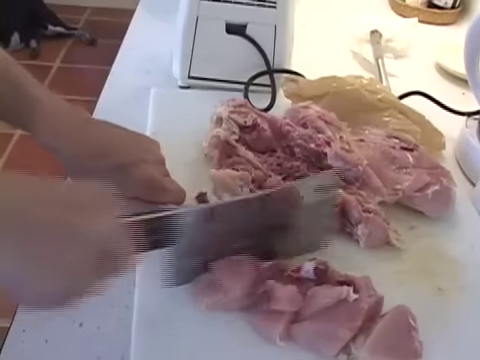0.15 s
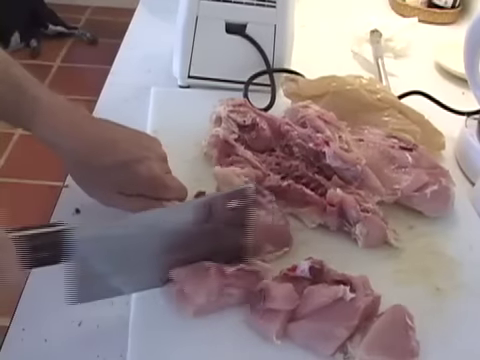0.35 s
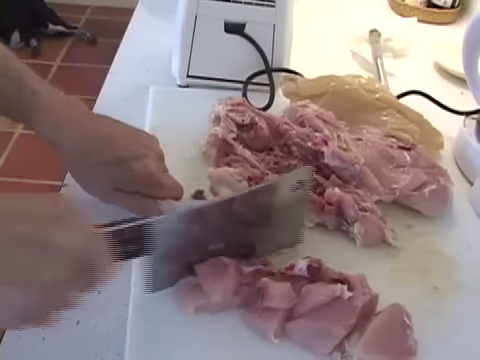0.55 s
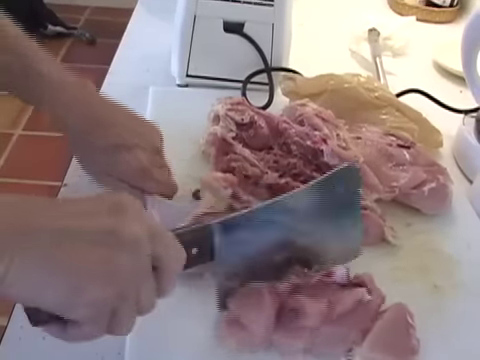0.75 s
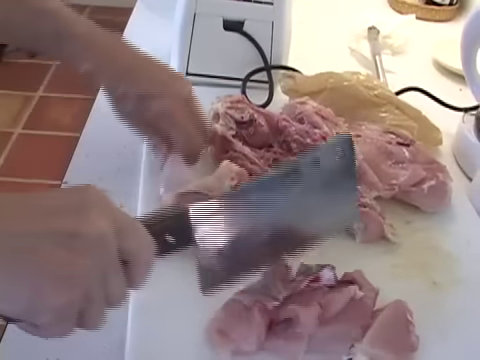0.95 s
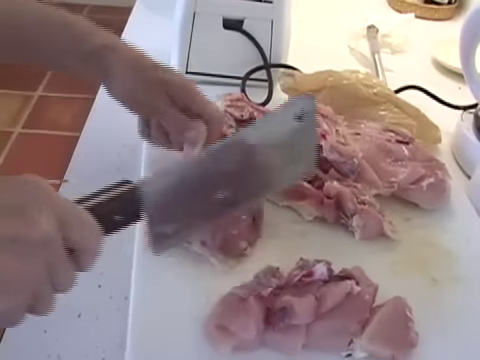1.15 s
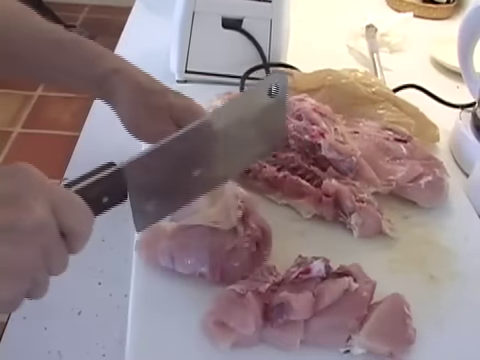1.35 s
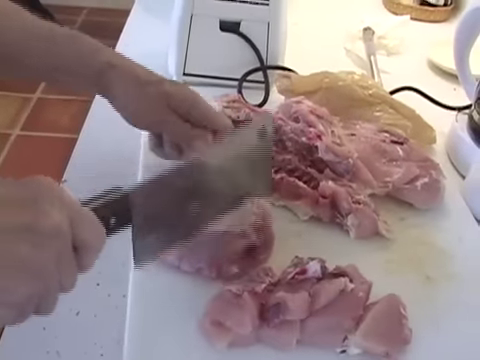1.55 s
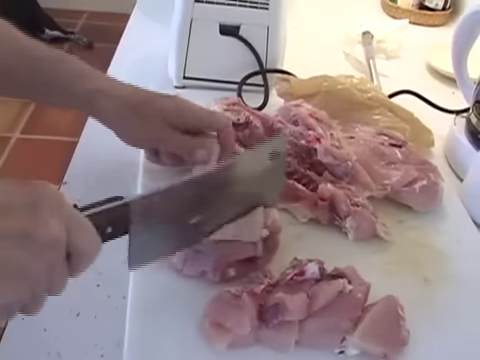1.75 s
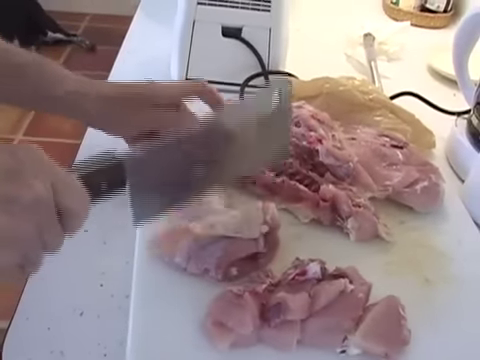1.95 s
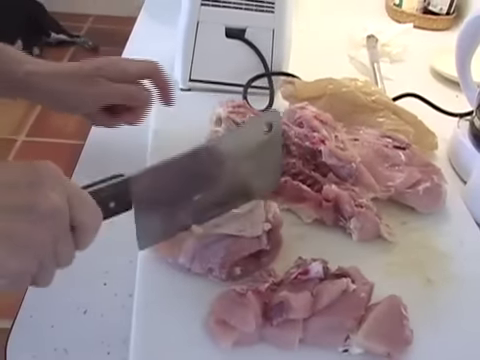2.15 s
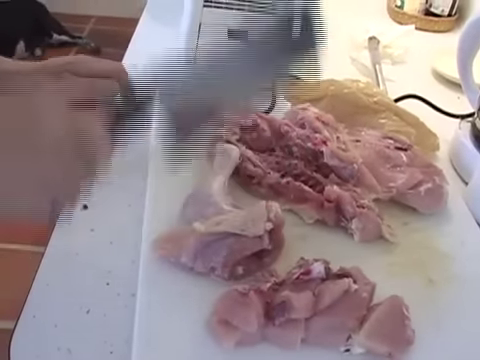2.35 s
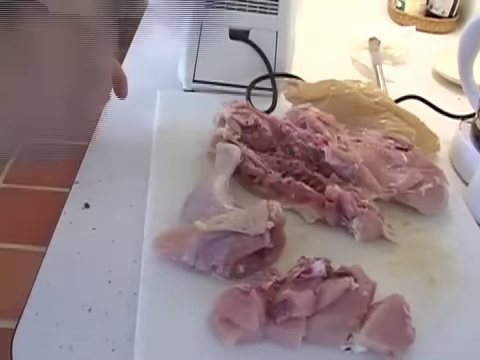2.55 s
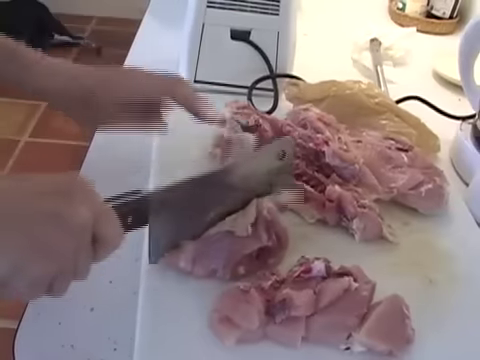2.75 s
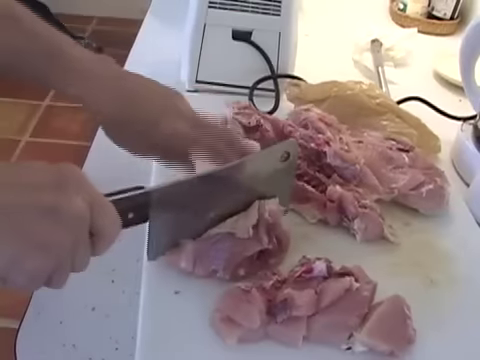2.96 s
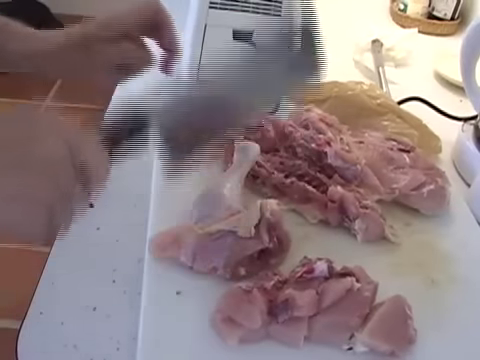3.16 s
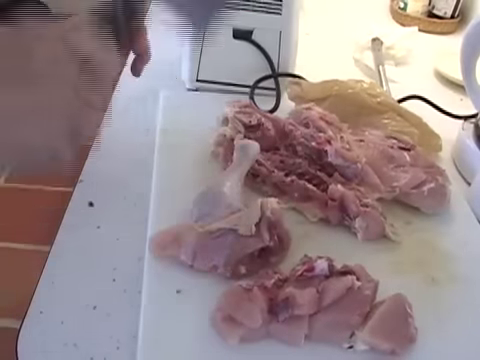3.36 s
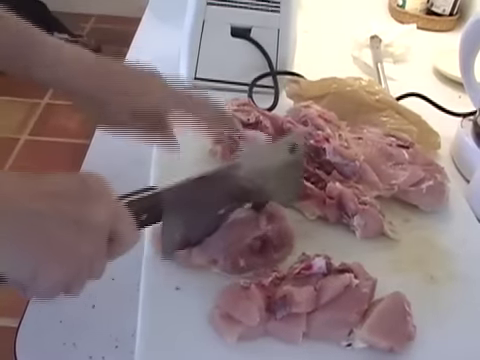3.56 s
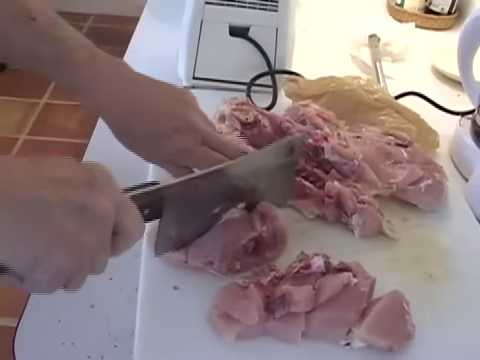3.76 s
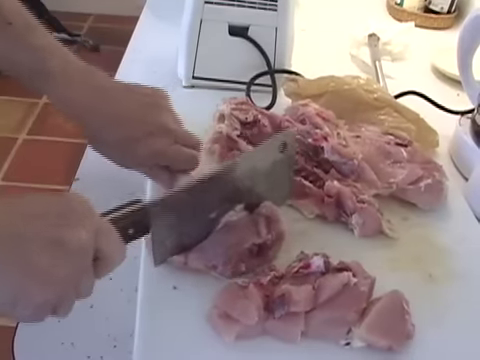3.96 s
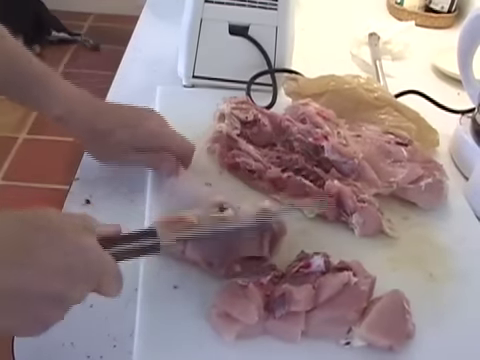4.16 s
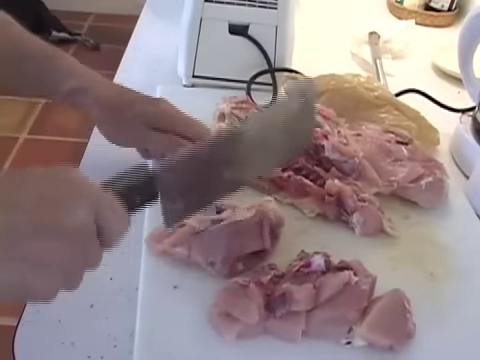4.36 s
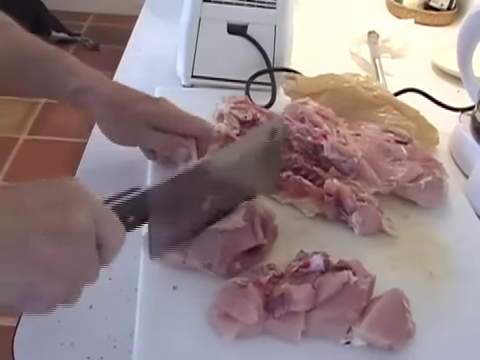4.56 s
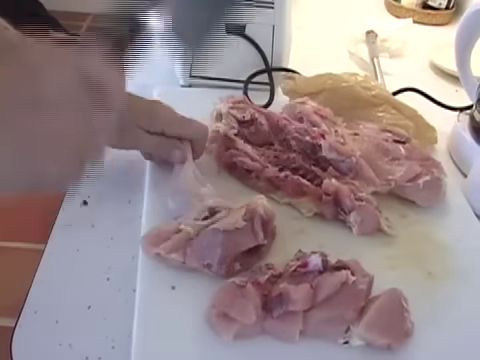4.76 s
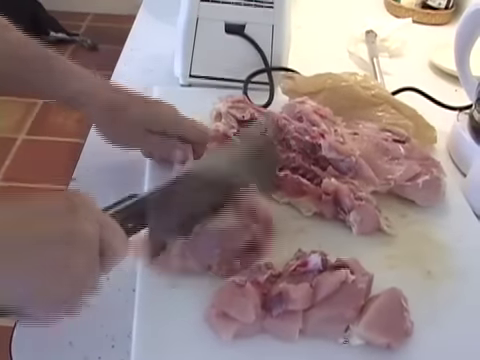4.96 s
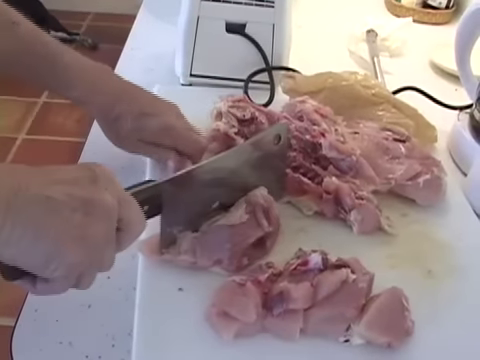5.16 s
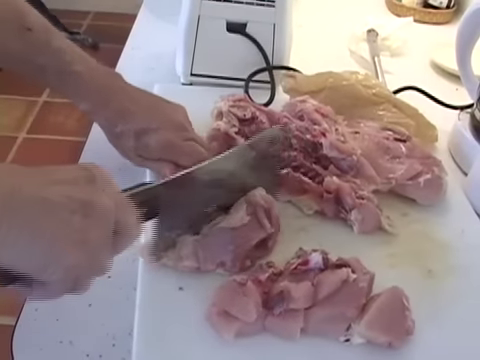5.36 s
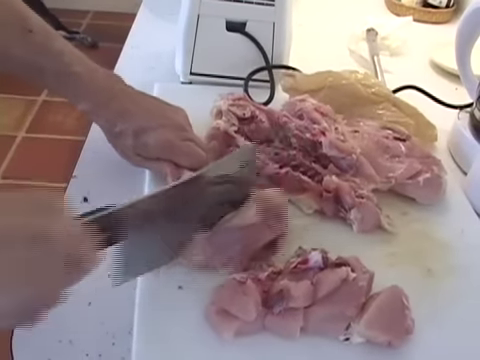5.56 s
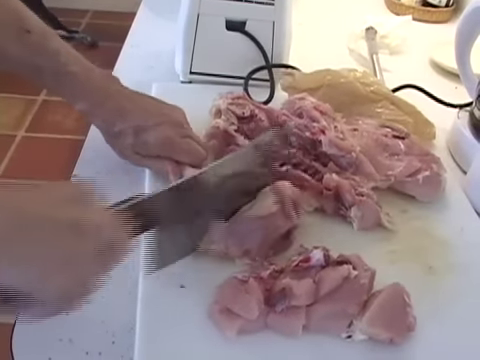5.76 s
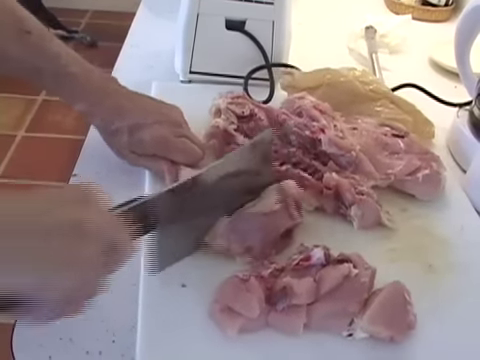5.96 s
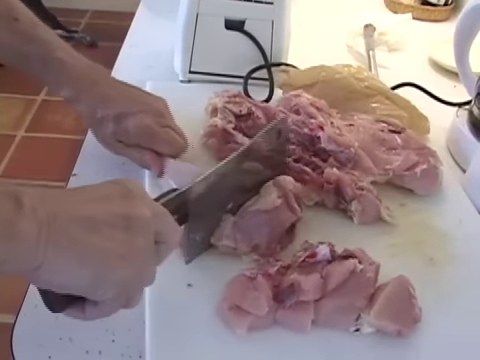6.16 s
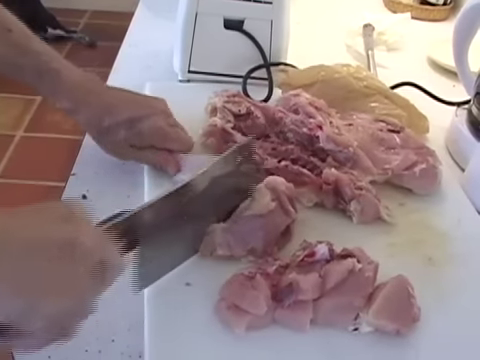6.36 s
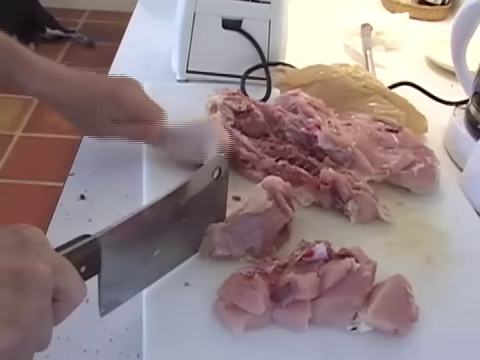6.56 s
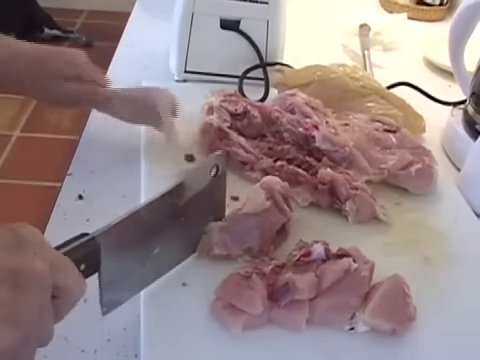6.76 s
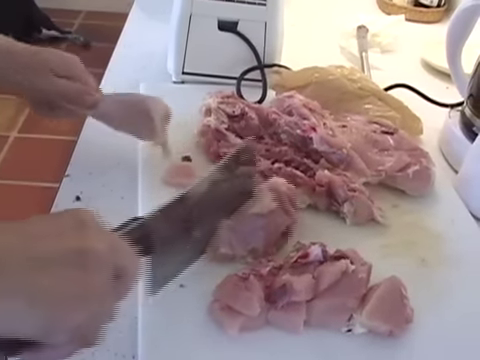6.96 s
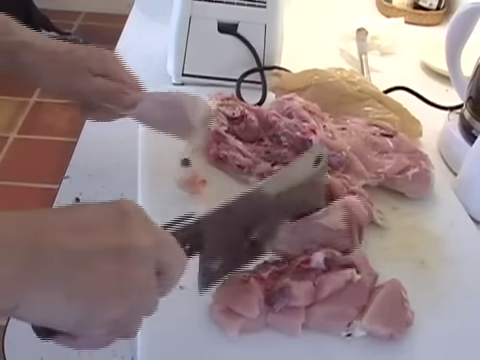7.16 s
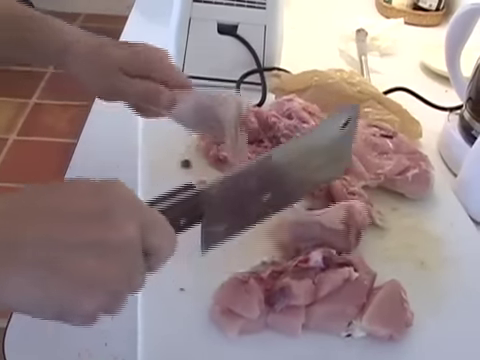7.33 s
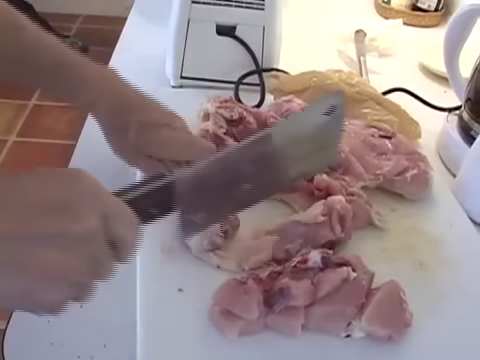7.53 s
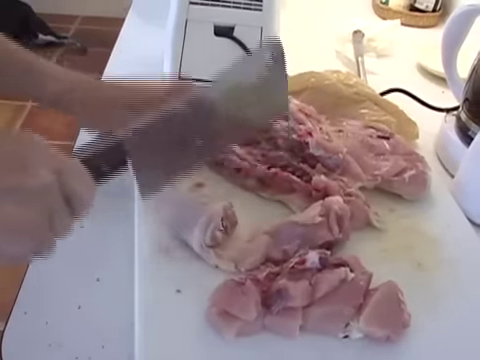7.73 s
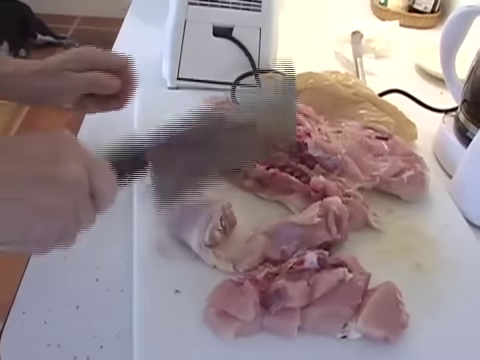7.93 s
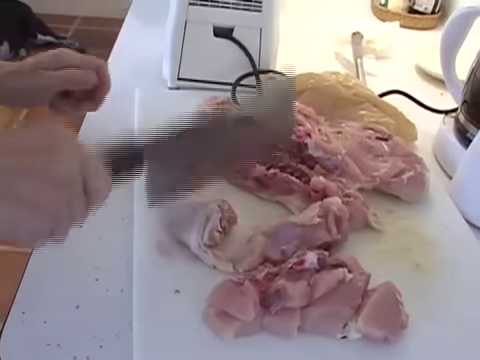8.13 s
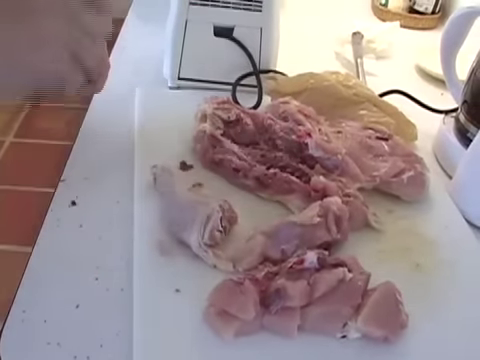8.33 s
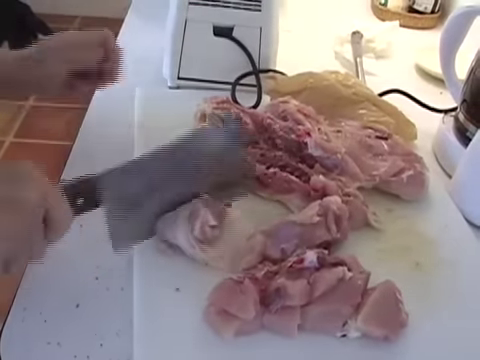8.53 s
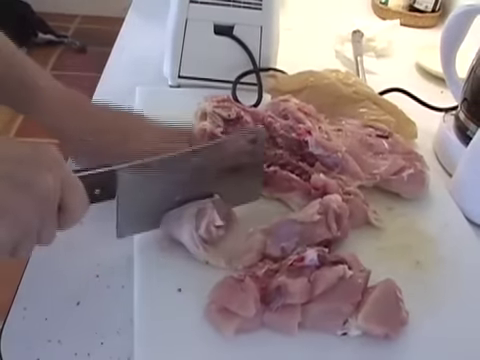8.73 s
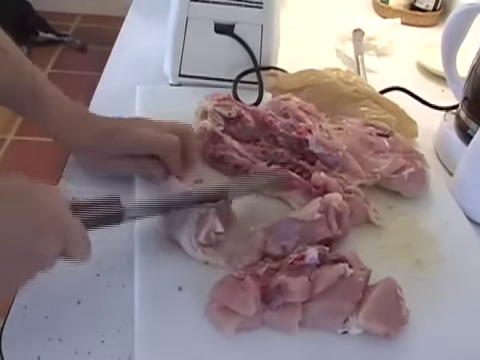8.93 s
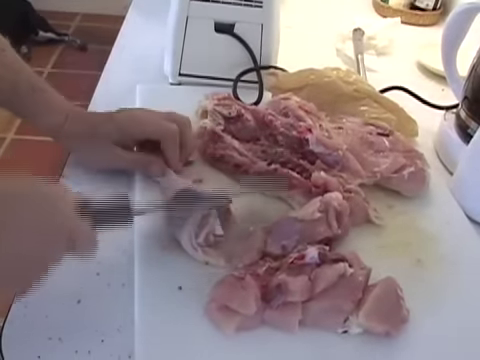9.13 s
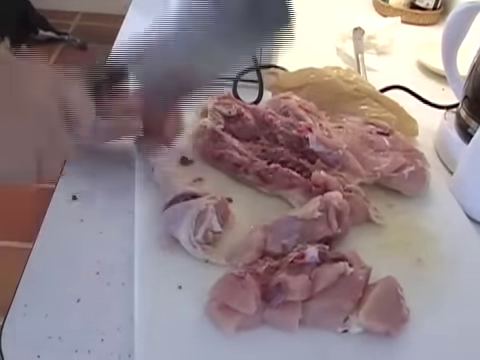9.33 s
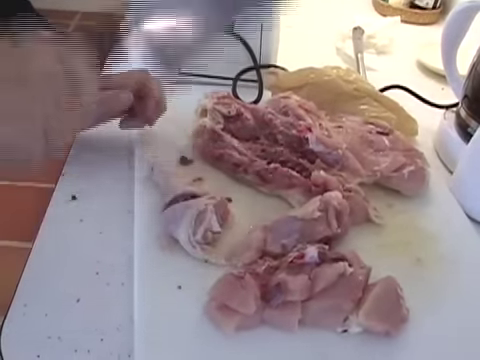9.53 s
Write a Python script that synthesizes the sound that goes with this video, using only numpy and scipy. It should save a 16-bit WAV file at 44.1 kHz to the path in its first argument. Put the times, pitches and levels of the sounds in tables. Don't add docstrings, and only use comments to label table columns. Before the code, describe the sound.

Raspy blade strokes and small wet ticks alternate with loud, ringing cleaver blows on a kitchen counter, with steady hum and fan noise.

```python
import sys
import numpy as np
from scipy import signal
from scipy.fft import rfft, irfft
from scipy.io import wavfile
from scipy.ndimage import uniform_filter1d

SR = 44100
rng = np.random.default_rng(int(sys.argv[2]) if len(sys.argv) > 2 else 0)


def unload_audio(sound):
    columns = np.transpose(np.atleast_2d(sound))
    steps = np.round(np.clip(columns, -1, 1) * 32767)
    wavfile.write(sys.argv[1], SR, steps.astype(np.int16))


def voltage_ratio(level):
    return 10 ** (np.asarray(level, float) / 20)


N = 427329

# centre_hz, width_hz, level_db
BLADE_MODES = [(1130, 70, -2), (1430, 66, 2), (1850, 29, -10), (2800, 30, -4.5), (3000, 22, -5),
               (4100, 52, -9.5), (4640, 87, -9), (5070, 60, -10.5), (7100, 34, -5), (7440, 64.6, -9.5),
               (8940, 45, -12)]


def evened(x):
    return x / np.sqrt(np.mean(x ** 2) + 1e-20)


def read(points, hz):
    f, value = np.transpose(points)
    return np.interp(np.log(hz + 1), np.log(f + 1), value)


def add(mix, start_s, sound):
    part = mix[..., round(start_s * SR):][..., :sound.shape[-1]]
    part += sound[..., :part.shape[-1]]


def colour(x, points):
    gain = voltage_ratio(read(points, np.fft.rfftfreq(len(x), 1 / SR)))
    return irfft(rfft(x) * gain, len(x))


def band(x, lo_hz, hi_hz):
    sos = signal.butter(3, [lo_hz, hi_hz], "bandpass", fs=SR, output="sos")
    return evened(signal.sosfilt(sos, x))


def resonate(x, hz, width_hz):
    turn = np.exp(2j * np.pi * hz * np.arange(len(x)) / SR)
    r = np.exp(-np.pi * width_hz / SR)
    return 2 * (turn * signal.lfilter([1 - r], [1, -r], x / turn)).real


def wander(length, rate_hz):
    return evened(signal.lfilter([1], [1, -np.exp(-2 * np.pi * rate_hz / SR)], rng.standard_normal(length)))


def noise_pair(length, same, shape):
    frames, hz = length // 128 + 5, np.fft.rfftfreq(512, 1 / SR)[:, None]
    a, b, c, d = rng.standard_normal((frames, 257, 4)).T
    like = np.clip(read(same, hz), -.985, .985)
    left = a + 1j * b
    right = like * left + np.sqrt(1 - like ** 2) * (c + 1j * d)
    z = np.array([left, right]) * shape(hz, np.arange(frames) * 128 / SR)
    return signal.istft(z, nperseg=512, noverlap=384)[1][:, :length]


def causal(points):
    log_gain = np.log(voltage_ratio(read(points, abs(np.fft.fftfreq(8192, 1 / SR)))))
    return np.fft.ifft(np.exp(log_gain - 1j * signal.hilbert(log_gain).imag)).real[:4096]


def stroke(start_s, bear_s, slide_s, top_db, lost_db):
    # hz, level_db (per Hz)
    rub = [(500, -32), (1000, 0), (1450, 1), (2600, -4.5), (5000, -10), (7200, -15.5), (10000, -41.5),
           (15000, -68)]
    lift_s, push_lag_s, grit = .05, 0.02, .27
    t = np.arange(0, bear_s + slide_s + lift_s, 1 / SR)

    def pressure_db(t):
        rise_db = -19 * np.clip(1 - t / bear_s, 0, 2) ** 1.6
        loss_db = lost_db * np.clip((t - bear_s) / slide_s, 0, 1)
        lift_db = -22.5 * np.maximum(t - bear_s - slide_s, 0) / lift_s
        return top_db + rise_db - loss_db + lift_db

    slip_db = 4.5 * np.minimum(rng.exponential(1, len(t)), 3)
    slips = (rng.random(len(t)) < 900 / SR) * voltage_ratio(slip_db) * rng.choice([-1, 1], len(t))
    drive = (1 - grit) * rng.standard_normal(len(t)) + grit * evened(slips)
    steel = evened(sum(voltage_ratio(db) * evened(resonate(drive, hz, 1.2 * w)) for hz, w, db in BLADE_MODES))
    push = band(drive, 130, 1100) + 1.6 * evened(resonate(drive, 300, 120))
    push_db = -7.5 + 3 * (5.8 < start_s < 7.3)
    hiss_db = -67.5 + .15 * (pressure_db(t) + 40)
    sound = voltage_ratio(pressure_db(t)) * (evened(colour(drive, rub)) + voltage_ratio(-8.5) * steel)
    sound += voltage_ratio(pressure_db(t - push_lag_s) + push_db) * push
    sound += voltage_ratio(hiss_db) * band(drive, 6500, 12500)
    return voltage_ratio(-5.0 + 2.6 * wander(len(t), 40)) * sound * signal.windows.tukey(len(t), .08)


def kitchen():
    # pitch_hz, level_db (rms)
    hum = [(59.2, -61.5), (102.3, -58), (118.4, -51.5), (199.2, -57), (236.9, -61), (301.5, -58.5),
           (376.8, -66), (403.7, -64.5), (672.9, -66), (1082, -68.5)]
    # hz, level_db (per Hz)
    fan = [(12, -37), (20, -8.5), (120, -3.5), (170, -13.5), (390, -8), (620, -16), (1000, -14),
           (2000, -30)]
    # hz, likeness (-1 to 1)
    fan_same = [(60, 0.91), (150, 1), (380, 0.92), (950, 0.97), (2380, 0.11), (5980, 0.12), (15000, -0.4)]
    # hz, level_db (per Hz)
    mic_hiss = [(1000, -1), (2670, -0.5), (12400, -5.5), (16000, -7)]
    fan_db, mic_hiss_db = -43, -66

    def shape(hz, t):
        fan_shape_db = read(fan, np.minimum(hz, 2000)) - 22 * np.log2(np.maximum(hz / 2000, 1))
        hiss_shape_db = read(mic_hiss, hz) + mic_hiss_db - fan_db - 9
        return np.hypot(voltage_ratio(fan_shape_db), voltage_ratio(hiss_shape_db)) + 0 * t

    lines = np.zeros(N)
    for hz, db in hum:
        phase = 2 * np.pi * np.cumsum(hz + 1.5 * wander(N, 4.3)) / SR
        lines += voltage_ratio(db + 3.1 * wander(N, 2.2)) * np.sin(phase)
    air = evened(noise_pair(N, fan_same, shape))
    air_gain = voltage_ratio(fan_db - 3.5 + 1.2 * wander(N, 1.7))
    return np.sqrt(2) * lines * voltage_ratio([[-1.5], [1.2]]) + air_gain * air * voltage_ratio([[-.6], [.6]])


def mode(hz, db, t60_s, rise_s=0.0023):
    t = np.arange(round(min(t60_s, .75) * SR)) / SR
    return voltage_ratio(db - 60 * t / t60_s) * np.sin(2 * np.pi * hz * t) * (1 - np.exp(-t / rise_s))


def tick(db, hz, pan_db, share, decay_s):
    t = np.arange(600) / SR
    click = rng.standard_normal(600) * (t / .0006) * np.exp(-t / decay_s)
    snap = resonate(resonate(click, hz, hz * share), hz, hz * share)
    return voltage_ratio(db - 1.5 - np.array([[-pan_db], [pan_db]]) / 2) * snap / abs(snap).max()


def skip(db, hz):
    # pitch_hz, level_db, t60_s
    knock = [(181, -4.5, 0.067), (328, 0, 0.042), (620, -3, 0.026), (1120, -7, 0.027)]
    sound = np.zeros((2, SR // 2))
    add(sound, 0, tick(db, hz, 1.5, 0.71, 0.00098))
    for f, _, d in BLADE_MODES:
        far_db = 3 * abs(np.log2(f / hz))
        ring_db = db + d - 11.5 - far_db + 2.2 * rng.standard_normal()
        add(sound, 0, mode(f * rng.uniform(1.0, 1.015), ring_db, 0.055, rise_s=0.00062)[None])
    for f, d, t60_s in knock:
        add(sound, 0, mode(f * rng.uniform(0.886, 1.103), db + d - 3, t60_s, rise_s=0.00063)[None])
    return sound


def blow(db, thump_db, body_db, slap_db, crack_db):
    # hz, direct_db, push_db
    blow_shape = [(12, -36, -23.5), (55, -8, 11), (187, 4, 10.5), (503, -3.5, 1.85), (1230, -5, 1),
                  (4460, -1, -12), (8900, -7, -16), (16000, -29.5, -40)]
    blow_part = [1, 1, 2, 0, 3, 4, 4, 4]
    # pitch_hz, level_db, t60_s
    counter = [(35.3, 2, 0.77), (94.1, 8.5, 0.43), (123.7, -2.5, 0.18), (174.4, 1, 0.33), (218, -6, 0.38),
               (295, -3, 0.27), (347.4, 0.5, 0.24), (421.8, -11, 0.13), (506.4, -6, 0.25),
               (583.5, -9.5, 0.051), (780, 0, 0.33), (970, 2.5, 0.18)]
    extra_db = 0.46 * np.maximum(db + 16, 0)
    parts_db = db + extra_db + np.array([0, thump_db - 0.52 * extra_db, body_db, slap_db, crack_db])
    direct_points = [(hz, parts_db[k] + d) for k, (hz, d, _) in zip(blow_part, blow_shape)]
    push_points = [(hz, parts_db[k] + d) for k, (hz, _, d) in zip(blow_part, blow_shape)]

    t = np.arange(2000) / SR
    late = np.maximum(t - .0022, 0)
    burst = (np.exp(-late / 0.0039) + 0.025 * np.exp(-late / .012)) * (1 - np.exp(-late / 0.00046))
    burst += 0.076 * (late == 0)
    direct = np.zeros(SR)
    noise = rng.standard_normal(2000) * burst
    add(direct, 0, voltage_ratio(10.5) * signal.fftconvolve(noise, causal(direct_points)))

    spread = rng.standard_normal((len(counter), 2)) * [1, 2]
    for (hz, d, t60_s), (u, v) in zip(counter, spread):
        part = 1 if hz < 110 else 2 if hz < 280 else 0 if hz < 700 else 3
        add(direct, 0, mode(hz * (1 + 0.017 * u), parts_db[part] - 8.5 + d + v, t60_s))
    for hz, _, d in BLADE_MODES:
        add(direct, .002, mode(hz, parts_db[4] - 21 + d + 3.1 * rng.standard_normal(), .2))
    return direct, voltage_ratio(37) * causal(push_points)


def room(x):
    # hz, t60_s
    room_t60 = [(40, 0.55), (150, 0.41), (500, .37), (1500, 0.38), (4000, 0.39), (9000, 0.33),
                (16000, 0.22)]
    # hz, likeness (-1 to 1)
    room_same = [(60, 1), (950, 1), (1500, 0.91), (2380, 0.31), (5980, -0.14), (15000, -0.3)]
    # hz, lean_db
    room_lean = [(60, -0.8), (500, 0.2), (1500, -1), (4000, 4.5), (8000, 2), (14000, -6.5)]

    def shape(hz, t):
        lean_db = np.array([1, -1])[:, None, None] * read(room_lean, hz) / 2
        return voltage_ratio(lean_db - 60 * t / read(room_t60, hz))

    turn = np.arange(N) / SR * 2 * np.pi * .37
    out = np.zeros((2, N))
    for k in range(3):
        tail = noise_pair(SR, room_same, shape)
        tail *= 1 - np.exp(-np.arange(SR) / SR / 0.0012)
        share = np.sqrt(2 / 3) * np.cos(turn + k * 2 * np.pi / 3)
        out += signal.fftconvolve((x * share)[None], tail / np.linalg.norm(tail[0]), axes=1)[:, :N]
    return out


def scene():
    # start_s, bear_s, slide_s, top_db (pressure), lost_db (while sliding)
    stroke_rows = [(0.0, 0.0063, 0.064, -35.5, 9.5), (0.125, 0.072, 0.076, -29.5, 5.5),
                   (0.315, 0.054, 0.073, -34.5, 3), (0.5, 0.063, 0.11, -36.5, 9),
                   (1.56, .045, 0.071, -56.5, 0), (3.225, 0.033, 0.18, -46.5, 9.5),
                   (4.22, 0.084, 0.036, -46, 10), (4.585, 0.019, .015, -42.5, 14.5),
                   (5.42, 0.12, 0.031, -45.5, 2), (5.63, 0.043, 0.084, -34.5, 8.5),
                   (5.81, 0.099, 0.019, -38, 3.5), (5.965, 0.047, .1, -36.5, 4),
                   (6.185, 0.024, .015, -43, 4.5), (6.32, 0.097, 0.19, -38.5, 15.5),
                   (7.03, 0.047, 0.062, -38, 2), (7.56, 0.028, 0.036, -49, 12), (8.9, .03, .08, -54.5, 1)]
    # start_s, pitch_hz, level_db, t60_s
    ring_rows = [(0.001, 36, -34, .6), (1.601, 170, -33, .1), (2.234, 200, -27, .12), (2.26, 96, -29, .15),
                 (2.725, 300, -10, 0.34), (3.58, 273.6, -24.5, 0.97), (7.591, 149, -35, .15),
                 (8.061, 201, -22, .11), (8.578, 140, -17, .4), (8.581, 347, -4, 0.4)]
    # start_s, peak_db, centre_hz, pan_db
    tick_rows = [(0.0101, -25.5, 4800, 13), (0.027, -34, 3020, 1.5), (2.24, -41, 2660, -2.0),
                 (3.248, -39, 3070, 5), (4.0994, -40, 2800, 5), (4.1594, -39, 3460, 8),
                 (4.248, -40, 3030, 4), (4.3035, -30.5, 7080, 10), (4.318, -38, 4070, 12),
                 (4.3637, -37, 4300, 6), (4.5994, -30, 6200, 6), (4.6114, -35, 5170, 7),
                 (5.8705, -34, 3680, 9), (5.9148, -28, 2960, 3), (6.0748, -26, 2620, 2.0),
                 (6.2128, -42, 2890, 7.5), (7.5882, -30.5, 4980, 7), (8.0603, -43, 4100, 3),
                 (8.9141, -30, 5070, 7), (8.9496, -32, 5900, 4.5), (8.9888, -32.5, 4650, 7),
                 (9.051, -34.5, 8260, 0.5), (9.061, -32.5, 7400, 5), (9.205, -41, 2895, 6)]
    # start_s, peak_db, centre_hz
    nick_rows = [(0.013, -33, 1150), (0.692, -25.5, 1600), (0.7072, -15.5, 980), (4.3022, -31.5, 1230),
                 (5.6747, -33, 1430), (7.1063, -27, 1430), (7.1464, -27, 1000), (8.551, -41.5, 2000),
                 (9.0607, -32, 1430), (9.2053, -32.5, 1390)]
    # start_s, peak_db, centre_hz
    smack_rows = [(0.1575, -40, 7200), (0.8856, -42, 9160), (0.9674, -44, 9670), (2.25, -38, 12000),
                  (2.8654, -30, 8400), (3.742, -43, 11000), (3.8, -41, 7000), (3.832, -40, 6500),
                  (3.873, -47, 10000), (3.951, -44, 9000), (3.96, -38.5, 8400), (3.9759, -36.5, 9040),
                  (4.1727, -37, 9240), (4.2273, -39, 11100), (5.3627, -39, 12100), (5.391, -42, 7280),
                  (5.4485, -40, 7030), (6.525, -29.5, 12100), (6.732, -35, 10330), (7.273, -45, 6000),
                  (7.557, -30.5, 8650), (8.8681, -44, 9180), (9.0369, -37, 8300), (9.0997, -35, 8650),
                  (9.129, -37, 9050)]
    # start_s, peak_db, centre_hz
    skip_rows = [(0.1385, -33, 7100), (0.7065, -15, 1420), (4.2898, -32.5, 7080), (5.679, -22, 2970),
                 (7.0384, -35.5, 3130), (7.054, -35, 4500), (7.0654, -31, 4500), (7.0822, -24.5, 5950),
                 (7.092, -25, 3500), (7.107, -20, 3000), (7.1327, -23.5, 3450), (7.1454, -21.5, 4200),
                 (7.158, -35, 3000)]
    # thump_db (floor), body_db (counter), slap_db, crack_db
    blow_rows = [(0.704, -24.5, -10.5, -5, -5.5, -10.5), (1.599, -46, 2, 4, -15, -9),
                 (2.228, -31.5, 3.5, 7.5, -8, -26), (2.26, -29, -4, 1, -9.5, -23),
                 (2.723, -4, -13, -8, -5, -9.5), (3.536, -5, -10.5, -7, -5.5, -3),
                 (4.654, -51.5, -6, -12, -10.5, -21), (5.047, 5, -17, -17, -6.5, -10.5),
                 (7.589, -40.5, 5.5, 6.5, -3, -8), (8.059, -30.5, -0.5, 10, -16.5, -21),
                 (8.575, -2, -15.5, -10.5, -7.5, -6)]

    blows, pushes, strokes, ticks = np.zeros(N), np.zeros(N), np.zeros(N), np.zeros((2, N))
    for row in stroke_rows:
        add(strokes, row[0], stroke(*row))
    for s, *row in ring_rows:
        add(blows, s, mode(*row))
    for s, db, hz, pan_db in tick_rows:
        add(ticks, s, tick(db, hz, pan_db, share=0.44, decay_s=0.0015))
    for s, db, hz in nick_rows:
        add(ticks, s, tick(db, hz, 0, share=0.51, decay_s=0.0022))
    for s, db, hz in smack_rows:
        add(ticks, s, tick(db, hz, .3, share=0.96, decay_s=0.00098))
    for s, *row in skip_rows:
        add(ticks, s, skip(*row))
    for s, *row in blow_rows:
        direct, push = blow(*row)
        add(blows, s - .001, direct)
        add(pushes, s + 0.0011, push)
    close = blows * voltage_ratio([[.3], [-.3]]) + strokes * voltage_ratio([[-1.5], [1.5]]) + ticks
    return close + room(pushes + voltage_ratio(-3) * strokes + voltage_ratio(-4.5) * ticks.mean(0)) + kitchen()


def band_limit(x):
    return signal.sosfilt(signal.butter(12, 16470, fs=SR, output="sos"), x)


def record(dry):
    grip = np.exp(-1 / (.006 * SR))
    power = signal.lfilter([1 - grip], [1, -grip], (dry ** 2).mean(0))
    power_db = 10 * np.log10(power + 1e-12)
    fall_db = np.arange(N) * 370.0 / SR
    held_db = np.maximum.accumulate(power_db + fall_db) - fall_db
    over_db = np.maximum(held_db + 14, 0)
    held = dry / voltage_ratio(.7 * uniform_filter1d(over_db, 64))
    clipped = 0.97 * np.tanh(held / 1.056)
    edge = signal.firwin(511, 15850, window=("kaiser", 9), fs=SR)[None]
    return band_limit(signal.oaconvolve(clipped, edge, "same"))


dry = scene()
out = record(dry)
unload_audio(out)
```